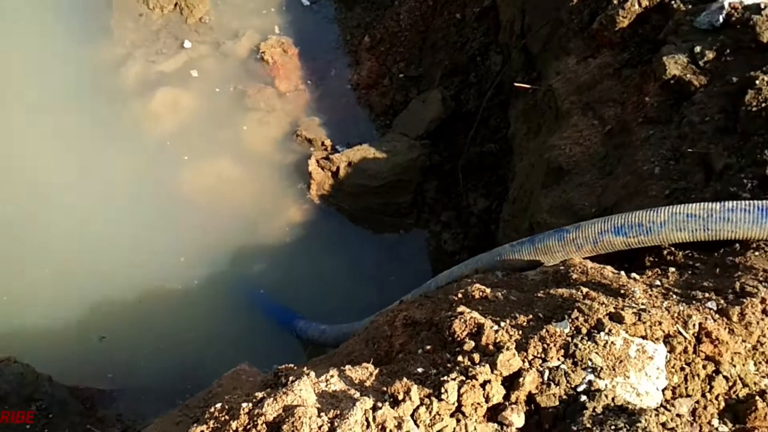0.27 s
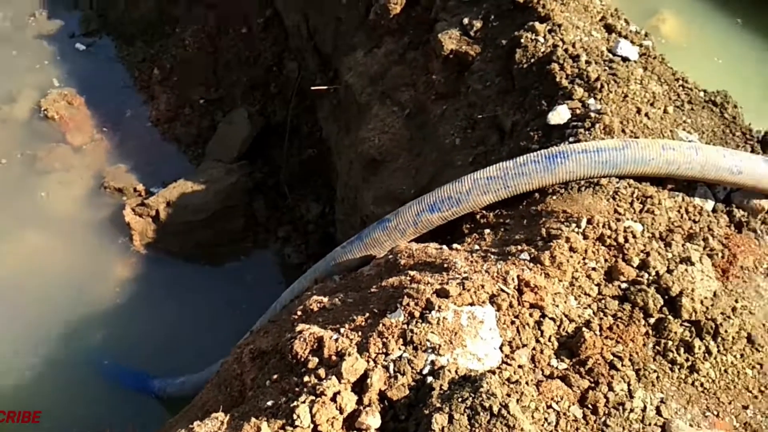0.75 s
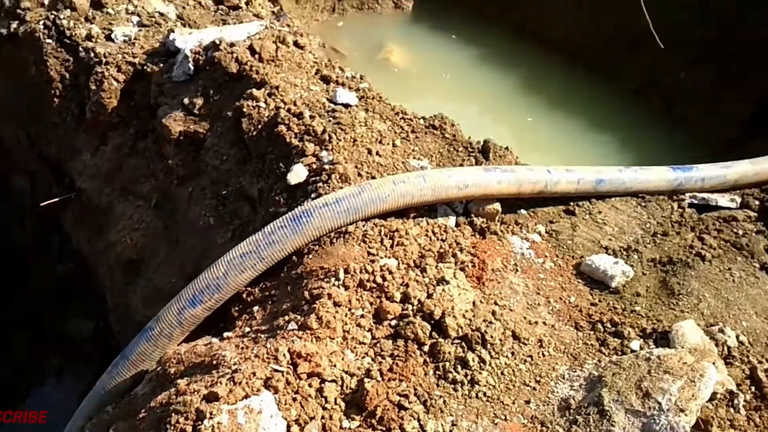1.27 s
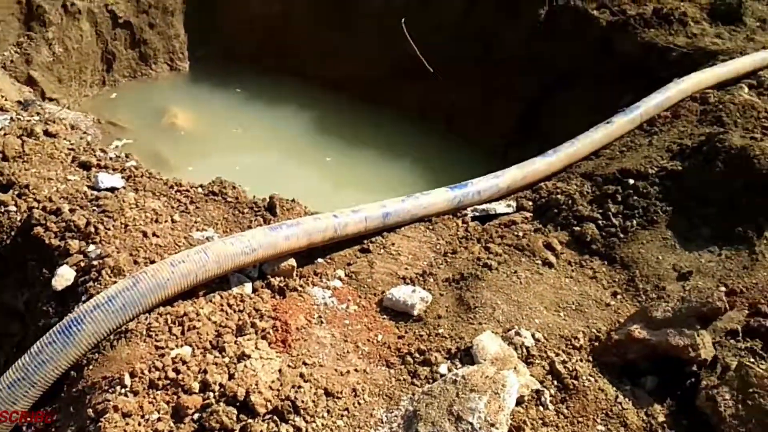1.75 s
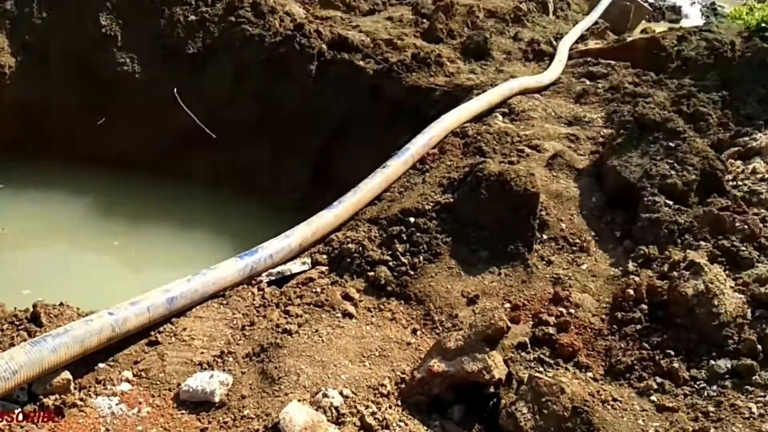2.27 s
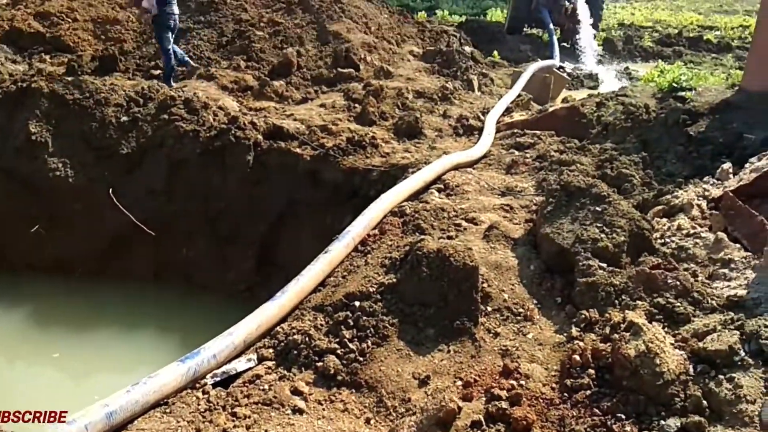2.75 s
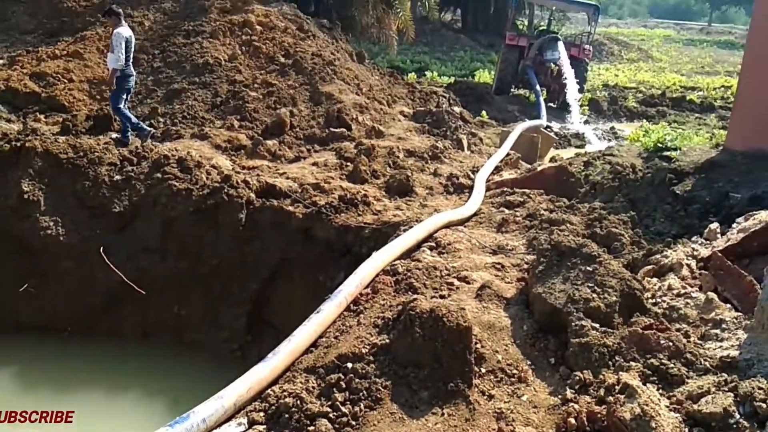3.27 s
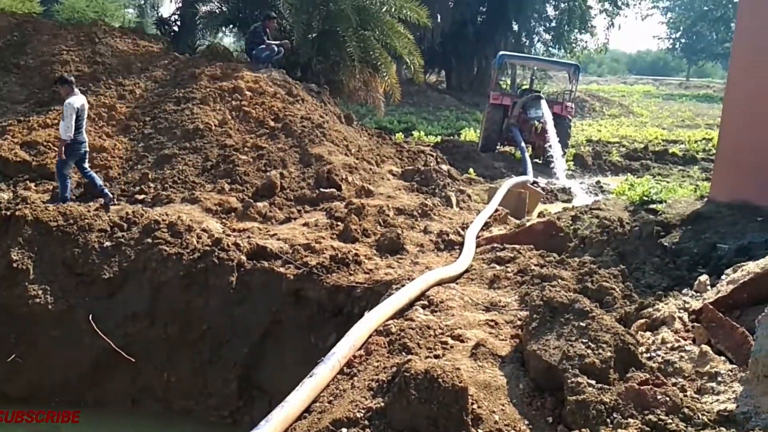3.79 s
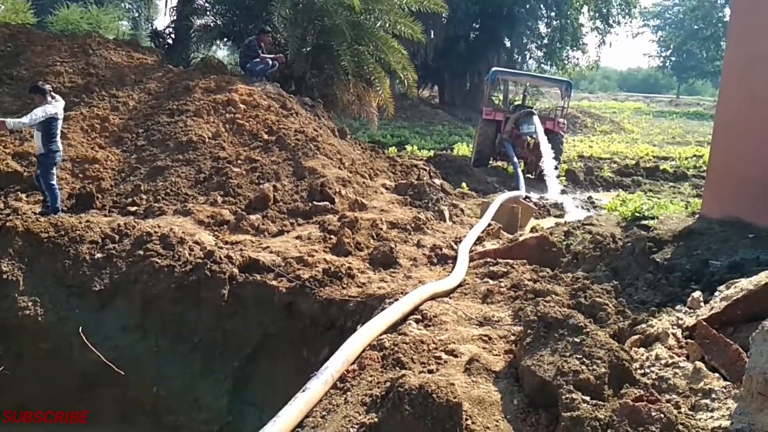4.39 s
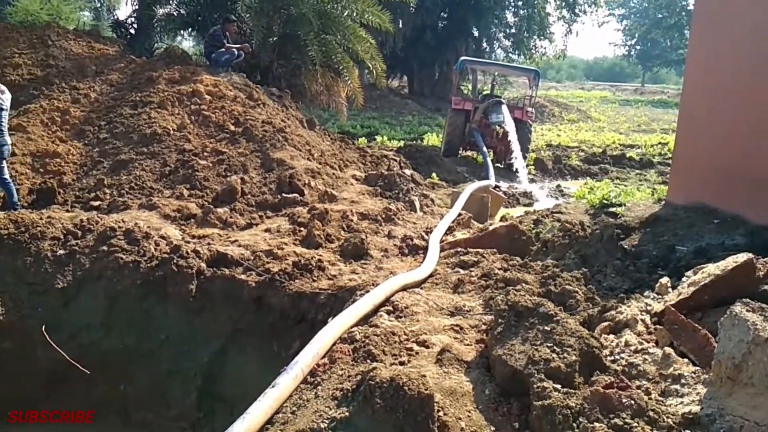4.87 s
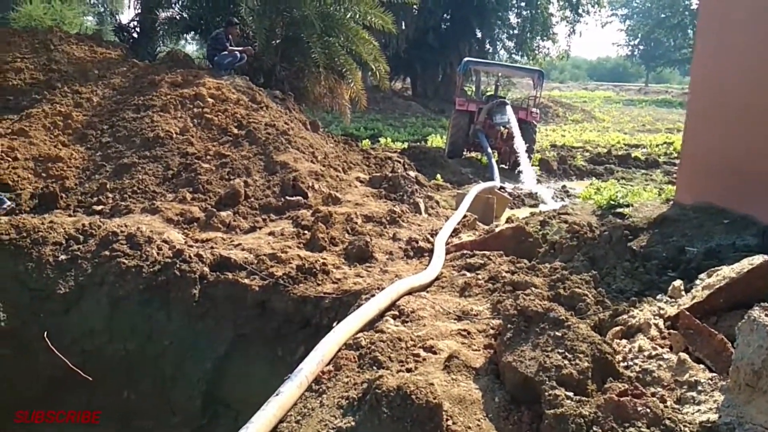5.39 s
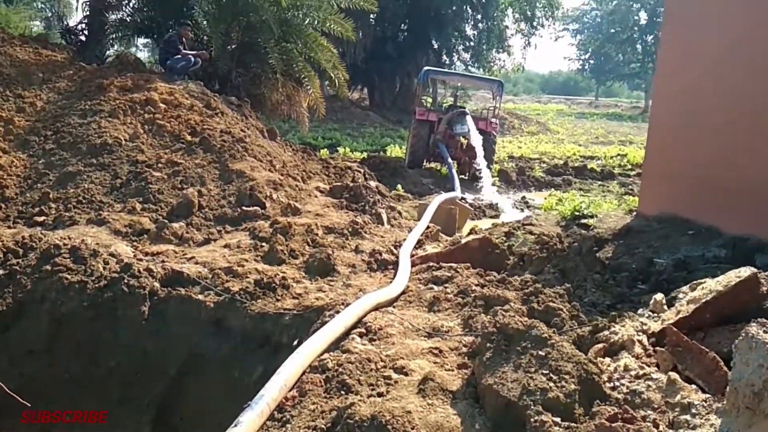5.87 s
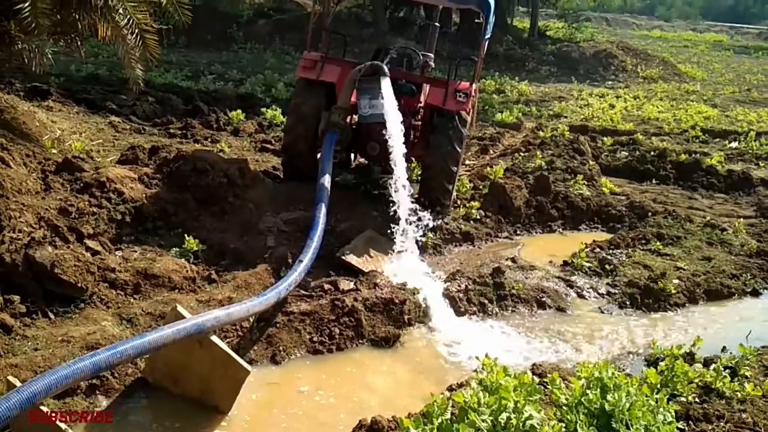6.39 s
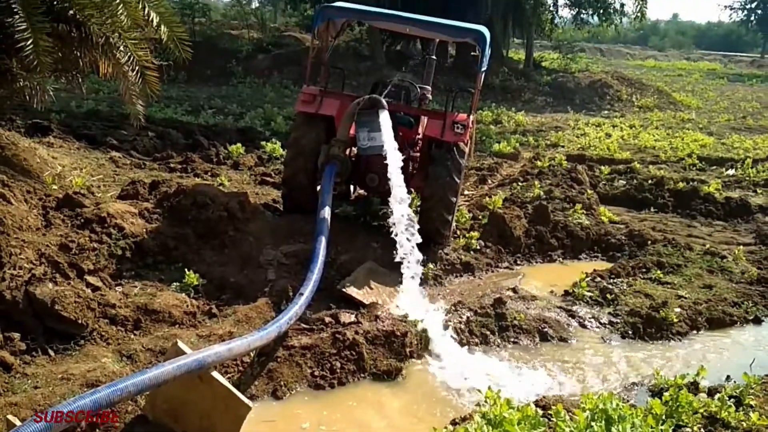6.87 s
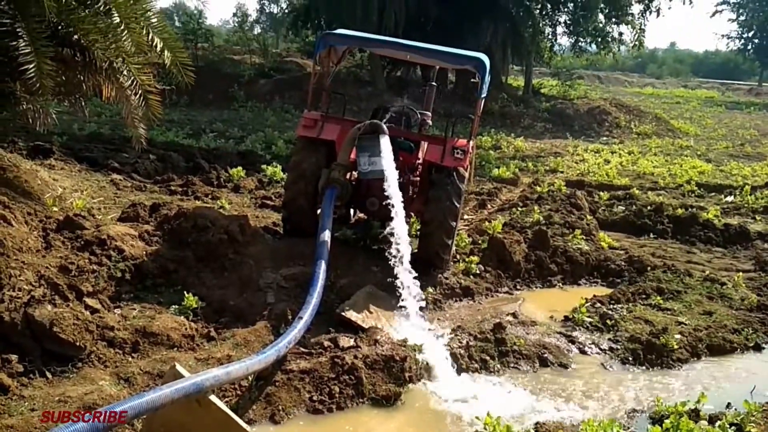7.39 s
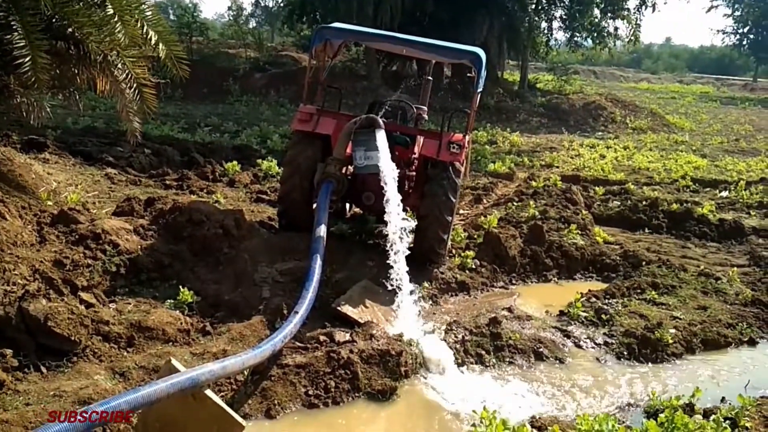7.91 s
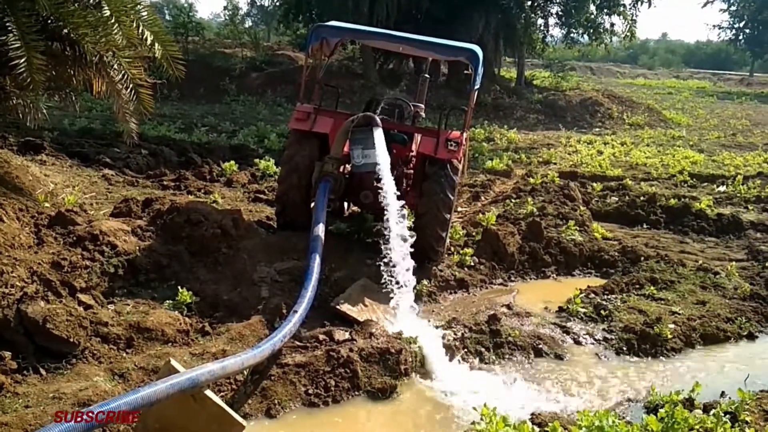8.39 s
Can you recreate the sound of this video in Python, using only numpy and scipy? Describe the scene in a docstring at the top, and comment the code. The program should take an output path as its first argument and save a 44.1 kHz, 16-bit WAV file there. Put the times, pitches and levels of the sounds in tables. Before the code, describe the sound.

Outdoors, a three-cylinder diesel tractor runs at constant speed in the distance, boxy and coloured as the microphone rises from a dug pit, then clearer with a sweeping hollow tone. Faint water hiss, tiny handling ticks and soft wind accompany it. Near six seconds it cuts abruptly to close by: louder engine throb and a water jet pounding, bubbling and slapping into a muddy pool until the end.

```python
"""First a distant three-cylinder diesel tractor and a water jet are heard from a microphone rising out of a pit:
the pit colours the engine noise and the ground echo sweeps a notch down through it. Ticks, far calls and gusts
follow; then the scene cuts to a spot beside the jet, which pounds and splashes into a muddy pool.
The engine is pulses ringing a pipe, patterned block noise and shaft-locked tones; the water is shaped noise,
damped drop and bubble rings and thudding air cavities."""
import sys
import numpy as np
from scipy import signal
from scipy.fft import rfft, irfft, next_fast_len
from scipy.io import wavfile
from scipy.ndimage import uniform_filter1d, map_coordinates

SR = 44100
rng = np.random.default_rng(int(sys.argv[2]) if len(sys.argv) > 2 else 0)


def unload_audio(sound):
    """Save the sound as a 16-bit wav file, at the path given as the first command line argument."""
    columns = np.transpose(np.atleast_2d(sound))
    # keep every value between -1 and 1, then stretch to whole-number steps
    steps = np.round(np.clip(columns, -1, 1) * 32767)
    wavfile.write(sys.argv[1], SR, steps.astype(np.int16))


N = 381465

# Exhaust spectrum: (multiple of the firing rate [1], relative level [dB])
FAR_PIPE = [(1, -8.5), (2, 4.5), (3, 6), (4, -4.5), (5, -20), (6, -17), (7, -11), (8, -20), (9, -26),
            (10, -27), (11, -29), (12, -40)]
NEAR_PIPE = [(1, -3), (2, 4), (3, 3), (4, -8), (5, -8), (6, -8), (7, -11), (8, -20), (9, -22), (10, -17),
             (11, -20), (12, -18)]
# Drone of block, gears and pump: (multiple of the cycle rate [1], nominal far level [dB], nominal near level [dB])
WHINE = [(13, -56, -50), (14, -56.5, -45), (16, -62, -45), (22, -61, -50), (26, -54.5, -55), (29, -63, -55),
         (34, -58, -53), (37, -56, -55), (46, -59, -60), (50, -60, -60), (54, -61, -56), (59, -62, -58),
         (62, -57.5, -44.5), (65, -63, -58), (78, -60, -56), (81, -60, -60), (87, -58, -52), (96, -55, -49),
         (105, -53, -54), (109, -64, -55), (115, -61, -57), (122, -65, -51), (129, -67, -58)]
# Low turbulence, of the far engine and of the plunging jet: (frequency [Hz], relative density [dB per Hz])
FAR_RUMBLE = [(15, -33), (28, 2), (45, -0.5), (80, -2.5), (125, -2), (200, -5.5), (320, -10.5),
              (450, -22.5), (600, -22), (1000, -63)]
PLUNGE = [(20, -22), (40, -1), (70, -1), (100, 6), (150, 3.5), (220, 2.5), (300, -4.5), (420, -12.5),
          (600, -17.5), (1000, -61)]
# Engine block noise: (frequency [Hz], relative density [dB per Hz])
FAR_BLOCK = [(200, -23), (350, -4.5), (550, -1.5), (800, 4), (950, -3), (1200, -0.5), (1400, 3),
             (1600, 5.5), (1900, -3.5), (2300, -3.5), (2700, -12), (3200, -18), (4500, -24.5)]
NEAR_BLOCK = [(220, 1), (380, -1.5), (416, -6), (456, -3), (564, -4.5), (641, -14.5), (756, 1), (875, -7),
              (951, 1.5), (1170, -6.5), (1480, -5), (1710, -6), (1840, -2.5), (2560, -16.5), (3400, -25.5),
              (4420, -60), (7480, -120)]
# Hiss of torn water: (frequency [Hz], relative density [dB per Hz])
FAR_SPRAY = [(1760, 2.5), (3000, 4.5), (3650, -3), (4200, -3.5), (5400, 3.5), (6540, -4), (7710, -3),
             (9480, -1), (11400, 2), (13300, 0), (14700, -5), (15600, -18)]
NEAR_SPRAY = [(1650, -38), (2800, 1.5), (3050, -7.5), (3300, -2), (3900, -6.5), (5270, 0.5), (6260, -7.5),
              (6870, -1.5), (7710, 0.5), (8900, -2), (11000, -3), (12000, 2.5), (12700, 4), (13500, 1),
              (15600, -10)]
# Left-right correlation: (frequency [Hz], correlation [-1 to 1])
ALIKE = [(60, 0.5), (150, 0.72), (290, .88), (640, 0.96), (1100, 0.96), (1600, 0.8), (3100, 0.2),
         (6000, 0.14), (15000, 0.17)]
FAR_SPRAY_ALIKE = [(2000, .7), (15000, .55)]
# Port colour, before it is eased off for long waves: (frequency [Hz], left minus right [dB])
FAR_TILT = [(60, 3.5), (120, -7), (240, -9), (480, 1.5), (950, -3.5), (1500, -4.5), (2000, 0), (3000, 0),
            (5500, 3.5), (7520, 1), (15000, -1)]
NEAR_TILT = [(60, -5), (95, 3), (150, 0), (240, 8), (380, -1.5), (600, -3.5), (950, -1), (1500, -6.5),
             (2380, -0.5), (3770, 9), (5980, 5), (9470, 4.5), (15000, -1)]
# Small handling ticks: (time [s], nominal peak [dB], brightest frequency [Hz], left minus right [dB])
TICKS = [(1.1228, -29, 2800, 0), (1.964, -33, 11000, 0), (4.0786, -35, 10000, 0), (4.8179, -28, 12700, -7),
         (4.856, -25, 12700, -7)]
# Faint distant calls: (time [s], length [s], start pitch [Hz], end pitch [Hz], level before quiver [dB])
FAR_CALLS = [(1.6, .1, 650, 615, -45.5), (3.77, .39, 3365, 3400, -49.5)]
# Colour the pit gives to sound from outside, at full depth: (frequency [Hz], gain [dB])
PIT_COLOUR = [(300, 6), (520, 7), (750, 1), (1000, 12), (1300, 3.5), (1650, -0.5), (2000, 3.5), (2600, 0),
              (3300, 2), (5500, 2)]
# Wind buffeting: (frequency [Hz], relative density [dB per Hz])
BREEZE = [(15, -30), (35, -7), (80, 15.5), (160, 6.5), (280, -7), (450, -6), (900, -50)]
# Light gusts above the pit: (time [s], half-width [s], level [dB])
GUSTS = [(2.85, 0.4, -36), (5.45, 0.25, -41)]
# The jet pounds the pool harder: (time [s], half-width [s], gain [dB])
SURGES = [(6.15, 0.08, 2.5), (6.48, 0.084, 7), (6.77, 0.054, 7), (7.1, 0.23, 1.5), (7.54, 0.14, 7.5),
          (7.8, 0.05, 2.5)]
# Heavy lumps of the jet slapping into the pool: (time [s], nominal peak [dB], initial cavity pitch [Hz])
SLAPS = [(6.525, -21, 95), (6.768, -21, 125), (7.432, -20, 95), (7.503, -13, 150), (7.568, -17, 120),
         (7.634, -22, 125), (7.763, -21, 150), (7.965, -16, 215)]
# Knocks of combustion and valve gear: (place in the cycle [0-1], full thump [dB], full tick [dB])
STROKES = [(.195, 0, 4.5), (.285, 4.5, 4), (.35, 0, 2.5), (.55, 2, 3.5), (.67, 1, 1), (.81, 2, 0),
           (.92, 2, 1)]
# Far hiss, each level read relative to its column's median: (time [s], middle level [dB], top level [dB])
HISS = [(0, -57.5, -71), (0.72, -61.5, -60.5), (1.39, -57, -56), (1.9, -59, -54), (2.33, -57, -59.5),
        (2.55, -55, -53), (3.3, -54.5, -50.5), (3.76, -56.5, -52.5), (4.35, -53.5, -49), (4.76, -56, -55),
        (5.2, -54, -54), (5.9, -52.5, -57)]

# Time of the cut [s]; how far on in its cycle the engine then is [cycles]
CUT_S, CUT_SKIP = 5.945, .37
# Mean engine cycle rate and upper band limit [Hz]
CYCLE_HZ, TOP_HZ = 15.385, 15700
# Source levels at the pit's edge and beside the jet [dB]
FAR_EXHAUST_DB, FAR_RUMBLE_DB, FAR_CLATTER_DB, FAR_SPRAY_DB = -30.3, -38, -37, -50.5
NEAR_EXHAUST_DB, NEAR_PLUNGE_DB, NEAR_CLATTER_DB, NEAR_SPRAY_DB = -25, -31.5, -29.5, -39
BUBBLES_DB, SPLATS_DB, DRAUGHT_DB = -40.5, -50, -33.5
# One smooth microphone move: left and right ears rise, it turns to the tractor and clears the rim (middle, easing [s])
RISE_S, RISE_EASE_S = 0.98, 0.43
RIGHT_RISE_S, RIGHT_RISE_EASE_S = 1.2, 0.4
TURN_S, TURN_EASE_S = 1.56, 0.25
CLEAR_S, CLEAR_EASE_S = 1.22, 0.65
# The ground echo emerges as the microphone leaves the pit's floor (middle, easing [s]); the right ear's share [1]
OPEN_S, OPEN_EASE_S, RIGHT_ECHO_SHARE = .4, .12, .5
# Ground echo lag, low and high [ms]; the soil's reflected share [1] and phase turn [rad]
LOW_ECHO_MS, HIGH_ECHO_MS = 0.46, 1.17
SOIL_SHARE, SOIL_TURN = .8, 1.1
# Lead of the left ear with the tractor to one side, then almost ahead [ms]
ASIDE_LEAD_MS, AHEAD_LEAD_MS = 0.36, 0.11
# Loss at the bottom of the pit [dB]; brief screening of the clatter by the bank (middle [s], half-width [s], loss [dB])
PIT_RUMBLE_LOSS_DB, PIT_CLATTER_LOSS_DB = 5.5, 1.5
SCREEN_S, SCREEN_WIDTH_S, SCREEN_DB = 0.69, 0.24, 1.5
# Inverted hiss echo off a nearby surface: share [1], lag in the pit and above it [ms], scale of the hand's sway [ms]
HISS_ECHO_SHARE, PIT_HISS_MS, CLEAR_HISS_MS, SWAY_MS = .38, .445, .308, .004
# Slow beat of the exhaust's third harmonic: period [s], first crest [s], swing either way [dB]
BEAT_S, BEAT_CREST_S, BEAT_DB = 1.425, 0.19, 2
# Inequality of the three firings [1]; share of block noise power that repeats every cycle [1]
FAR_UNEVEN, NEAR_UNEVEN = .28, .5
FAR_REPEAT, NEAR_REPEAT = .4, .34
# Half-widths of a thump and a tick [s]; the pump's churning leaves this share of the knock depth in dB close by [1]
THUMP_S, TICK_S, NEAR_STROKE_SHARE = .0028, .002, .6
# Random level scales [dB]: spray sputter, lumps in the pounding, quiver of the calls
FAR_FLUTTER_DB, NEAR_FLUTTER_DB, LUMPS_DB, QUIVER_DB = 1.2, 1.7, 1.4, 3.2
# Slap decay by 60 dB [s] and relative level of its churning noise [dB]
SLAP_T60_S, CHURN_DB = .075, -6


def amp(db):
    """Amplitude gain is ten to the power of decibels over twenty."""
    return 10 ** (np.asarray(db) / 20)


def unit(x):
    """Dividing by the root mean square gives an rms of 1."""
    return x / np.sqrt(np.mean(x ** 2) + 1e-20)


def along(points, hz):
    """Frequency is read on a logarithmic axis, with linear interpolation between points."""
    f, v = np.transpose(points)
    return np.interp(np.log(hz + 1e-3), np.log(f), v)


def wobble(rate):
    """Spline interpolation of random knots, `rate` a second, gives a slow smooth fluctuation."""
    knots = rng.standard_normal(int(N * rate / SR) + 4)
    return map_coordinates(knots, [np.arange(N) * rate / SR], order=2)


def ease(middle_s, ease_s):
    """A hyperbolic tangent moves smoothly from 0 to 1."""
    return .5 + .5 * np.tanh((np.arange(N) / SR - middle_s) / (2 * ease_s))


def hump(middle_s, width_s):
    """A Gaussian swells from 0 to 1 and back."""
    return np.exp(-((np.arange(N) / SR - middle_s) / width_s) ** 2)


def filtered(x, response):
    """A linear filter multiplies the spectrum by its frequency response."""
    size = next_fast_len(N + 8192)
    hz = np.fft.rfftfreq(size, 1 / SR)
    return irfft(rfft(x, size) * response(hz), size)[..., :N]


def delayed(x, seconds):
    """A changing path length is a moving delay, read here by interpolation."""
    return np.interp(np.arange(N) - seconds * SR, np.arange(N), x)


def spread(pair, spectrum, alike=ALIKE):
    """Mixing two unrelated signals as middle and side sets the ears' correlation; the middle has rms 1."""
    def mid_side(hz):
        turn = np.arccos(np.clip(along(alike, hz), -1, 1)) / 2
        return amp(along(spectrum, hz)) * [np.cos(turn), np.sin(turn)]

    mid, side = filtered(pair, mid_side)
    return np.array([mid + side, mid - side]) / np.std(mid)


def ports(x, tilt):
    """Each microphone port colours short waves in its own way, while long waves reach both equally."""
    def response(hz):
        short = hz ** 4 / (hz ** 4 + 350 ** 4)
        return amp(np.outer([1, -1], short * along(tilt, hz)) / 2)

    return filtered(x, response)


def from_pit(crank):
    """Distance, pit colour and echo interference shape the far tractor and jet as the microphone moves."""
    height, turn = ease(RISE_S, RISE_EASE_S), ease(TURN_S, TURN_EASE_S)
    depth = 1 - ease(CLEAR_S, CLEAR_EASE_S)

    block = over_ground(in_pit(clatter(crank, FAR_BLOCK, FAR_REPEAT), depth))
    # evening out the half-second level leaves the dB curve below in charge of loudness
    block /= np.sqrt(uniform_filter1d(block.mean(0) ** 2, SR // 2))
    clatter_db = FAR_CLATTER_DB - PIT_CLATTER_LOSS_DB * depth - SCREEN_DB * hump(SCREEN_S, SCREEN_WIDTH_S)
    engine = amp(clatter_db) * block
    engine += amp(FAR_EXHAUST_DB) * beating(exhaust(crank, FAR_PIPE, FAR_UNEVEN, scatter_db=0.67))
    rumble_db = FAR_RUMBLE_DB - PIT_RUMBLE_LOSS_DB * (1 - height) ** 3
    engine += amp(rumble_db) * rumble(crank, FAR_RUMBLE, throb_db=3.0)
    tones = [(multiple, far_db) for multiple, far_db, _ in WHINE]
    engine += (1 - 0.3 * depth) * over_ground(whine(crank, tones))

    left, right = engine + far_water() + calls()
    lead_ms = ASIDE_LEAD_MS + (AHEAD_LEAD_MS - ASIDE_LEAD_MS) * turn
    heard = ports(np.array([left, delayed(right, lead_ms / 1000)]), FAR_TILT)
    gusts = sum(amp(db) * hump(s, width) for s, width, db in GUSTS) * breeze(right_db=-7)
    return heard + gusts + ticks()


def clatter(crank, spectrum, repeat, strokes=1):
    """Periodic modulation: knocks shape block noise, part of which repeats exactly every engine cycle."""
    size = int(SR / CYCLE_HZ)
    pattern = unit(irfft(np.exp(2j * np.pi * rng.random((2, size // 2 + 1))), size))
    rattle = pattern[:, (crank % 1 * size).astype(int)]
    noise = np.sqrt(repeat) * rattle + np.sqrt(1 - repeat) * rng.standard_normal((2, N))
    bright = filtered(noise, lambda hz: hz ** 6 / (hz ** 6 + 1100 ** 6))

    def knock(place, width_s):
        away_s = ((crank - place + .5) % 1 - .5) / CYCLE_HZ
        return np.exp(-(away_s / width_s) ** 2)

    thump_db = sum(db * knock(place, THUMP_S) for place, db, _ in STROKES)
    tick_db = sum(db * knock(place, TICK_S) for place, _, db in STROKES)
    thumps = unit(amp(strokes * thump_db)) * (noise - bright)
    valve_ticks = unit(amp(strokes * tick_db)) * bright
    return spread(thumps + valve_ticks, spectrum)


def in_pit(x, depth):
    """Enclosure colour: the deeper the microphone, the more the pit's walls and rim filter the sound."""
    coloured = filtered(x, lambda hz: amp(along(PIT_COLOUR, hz)))
    return x + depth * (coloured - x)


def over_ground(x):
    """Comb interference: a soil echo, strongest in the bass, lags more as each ear rises."""
    heights = ease(RISE_S, RISE_EASE_S), ease(RIGHT_RISE_S, RIGHT_RISE_EASE_S)
    soil = lambda hz: SOIL_SHARE * np.exp(1j * SOIL_TURN) / (1 + (hz / 3300) ** 4)
    bounce = filtered(x, soil) * ease(OPEN_S, OPEN_EASE_S) * [[1], [RIGHT_ECHO_SHARE]]
    lags_ms = [LOW_ECHO_MS + (HIGH_ECHO_MS - LOW_ECHO_MS) * height for height in heights]
    return x + np.array([delayed(ear, lag_ms / 1000) for ear, lag_ms in zip(bounce, lags_ms)])


def exhaust(crank, pipe, uneven, scatter_db):
    """Pulse excitation of a resonator: three unequal firings a cycle each ring the pipe."""
    fired = np.flatnonzero(np.diff(np.floor(3 * crank)))
    cylinder = 1 + uneven * np.cos(2 * np.pi * np.arange(len(fired)) / 3)
    puffs = np.bincount(fired, cylinder * amp(scatter_db * rng.standard_normal(len(fired))), N)
    size = 2 ** 14
    hz = np.fft.rfftfreq(size, 1 / SR)
    multiples, db = np.transpose(pipe)
    gain = amp(np.interp(hz / (3 * CYCLE_HZ), [0, *multiples, 20], [-40, *db, -80]))
    # the doubled causal half of the cepstrum gives a pipe that rings only after its puff
    cepstrum = irfft(np.log(gain))[:size // 2]
    # the silencer's chamber holds the lowest waves back, so the puffs run together
    chamber = 62 ** 2 - hz ** 2 + 20j * hz
    ring = irfft(np.exp(rfft(2 * cepstrum, size)) * chamber.conj() / chamber)
    return unit(signal.fftconvolve(puffs, ring)[:N])


def beating(note):
    """Slow amplitude modulation: the third firing harmonic swells and fades."""
    third = filtered(note, lambda hz: np.exp(-((hz / CYCLE_HZ - 9) / 1.5) ** 4))
    swing = np.cos(2 * np.pi * (np.arange(N) / SR - BEAT_CREST_S) / BEAT_S)
    return note + (amp(BEAT_DB * swing) - 1) * third


def rumble(crank, spectrum, throb_db):
    """Modulated turbulence: low noise swells at each firing, or between firings if throb_db is negative."""
    throb = amp(throb_db * np.cos(6 * np.pi * crank))
    return spread(rng.standard_normal((2, N)) * throb, spectrum)


def whine(crank, tones):
    """Shaft-locked tones: phase follows the crank, so the shaft's twisting blurs the higher multiples most."""
    out = np.zeros(N)
    for multiple, db in tones:
        swell = amp(1.8 * wobble(6) - .5)
        twisted = crank + .001 * wobble(12)
        tone = np.sin(2 * np.pi * (multiple * twisted + rng.random()))
        out += np.sqrt(2) * amp(db) * swell * tone
    return out


def far_water():
    """Comb interference: the far jet's hiss meets a short inverted echo whose lag shifts with the microphone."""
    hiss = spray(FAR_SPRAY, FAR_SPRAY_ALIKE, drops_db=-10.5, flutter_db=FAR_FLUTTER_DB)
    lag_ms = PIT_HISS_MS + (CLEAR_HISS_MS - PIT_HISS_MS) * ease(TURN_S, TURN_EASE_S) + SWAY_MS * wobble(1.5)
    hiss = hiss - HISS_ECHO_SHARE * np.array([delayed(ear, lag_ms / 1000) for ear in hiss])
    top = filtered(hiss, lambda hz: hz ** 16 / (hz ** 16 + 9500. ** 16))
    s, *levels = np.transpose(HISS)
    middle_db, top_db = (np.interp(np.arange(N) / SR, s, db - np.median(db)) for db in levels)
    return amp(FAR_SPRAY_DB) * (amp(middle_db) * (hiss - top) + amp(top_db) * top)


def spray(spectrum, alike, drops_db, flutter_db):
    """Torn water is fizz plus sharp droplet impacts, sputtering as lumps of the jet land."""
    drops = grains(1300, 5400, 8700, cycles=0.36, scatter_db=3.5, rise=0, size=32)
    sputter = amp(flutter_db * unit(.25 * wobble(13) + wobble(36) + .7 * wobble(95)))
    fizz = unit(rng.standard_normal((2, N)) + amp(drops_db) * drops)
    # the finest mist comes and goes on its own
    mist = filtered(fizz, lambda hz: 1 / (1 + (9000 / (hz + 1)) ** 8))
    fizz = fizz + (amp(1.1 * wobble(24)) - 1) * mist
    return sputter * spread(fizz, spectrum, alike)


def grains(rate, low_hz, high_hz, cycles, scatter_db, rise, size):
    """Damped oscillators: random rings of drops or bubbles, `rate` a second, reach both ears; rms 1."""
    when, pitch, weight, place = rng.random((int(rate * N / SR), 4)).T[..., None]
    hz = low_hz * (high_hz / low_hz) ** pitch
    # age 1 is the given number of cycles at the starting pitch
    age = hz * np.arange(size) / SR / cycles
    strength = amp(-scatter_db * np.log(0.011 + weight))
    ring = strength * np.exp(-3 * age) * np.sin(2 * np.pi * cycles * age * (1 + rise * age))
    start = (when * N).astype(int) + np.arange(size)
    # an earlier arrival at one ear is a later one at the other
    lag = (place * SR * .0006).astype(int)
    ears = [np.bincount((start + d).ravel(), ring.ravel(), N)[:N] for d in (lag, lag.max() - lag)]
    return unit(np.array(ears))


def ticks():
    """Damped impacts: decaying noise through a resonance gives tiny dry clicks right at the microphone."""
    out, t = np.zeros((2, N)), np.arange(SR // 50) / SR
    for s, db, hz, pan_db in TICKS:
        crack = amp(db - 60 * t / 0.0095) * rng.standard_normal((2, len(t)))
        ring = signal.lfilter(*signal.iirpeak(min(hz, TOP_HZ), 4, SR), crack)
        pan = amp([[pan_db / 2], [-pan_db / 2]])
        out[:, round(s * SR):][:, :len(t)] += pan * (ring + 0.32 * crack)
    return out


def calls():
    """Gliding tones: integrated frequency gives the phase of a hoot and a thin whistle far across the field."""
    out, t = np.zeros(N), np.arange(N) / SR
    for s, length, start_hz, end_hz, db in FAR_CALLS:
        u = np.clip((t - s) / length, 0, 1)
        hz = (start_hz + (end_hz - start_hz) * u) * (1 + .003 * wobble(70))
        level = amp(db + QUIVER_DB * wobble(70)) * (4 * u * (1 - u)) ** .3
        out += level * np.sin(2 * np.pi * np.cumsum(hz) / SR)
    return out


def breeze(right_db):
    """Wind turbulence: buffeting is unrelated at the two ports and stronger on the windward left."""
    eddies = rng.standard_normal((2, N)) * amp(4.8 * np.array([wobble(11), wobble(12)]))
    return unit(filtered(eddies, lambda hz: amp(along(BREEZE, hz)))) * amp([[0], [right_db]])


def beside_jet(crank):
    """Superposition close by: the tractor sounds with a jet that churns the pool into bubbles and spray."""
    surge_db = sum(db * hump(s, width) for s, width, db in SURGES)
    engine = amp(NEAR_CLATTER_DB) * clatter(crank, NEAR_BLOCK, NEAR_REPEAT, NEAR_STROKE_SHARE)
    engine += amp(NEAR_EXHAUST_DB) * beating(exhaust(crank, NEAR_PIPE, NEAR_UNEVEN, scatter_db=0.9))
    engine += whine(crank, [(multiple, near_db) for multiple, _, near_db in WHINE])
    plunge_db = NEAR_PLUNGE_DB + surge_db + LUMPS_DB * wobble(22)
    plunge = amp(plunge_db) * rumble(crank, PLUNGE, throb_db=-3.5)
    draught = amp(DRAUGHT_DB + surge_db) * breeze(right_db=-6)
    # one channel of bubbles serves both ears
    bubble_rings = grains(220, 534, 2360, cycles=12.3, scatter_db=0.0, rise=0.11, size=700)[0]
    bubbles = amp(BUBBLES_DB) * unit(bubble_rings)
    splats = amp(SPLATS_DB) * grains(160, 1350, 6500, cycles=0.76, scatter_db=0.5, rise=0, size=200)
    water = splats + amp(NEAR_SPRAY_DB) * spray(NEAR_SPRAY, ALIKE, drops_db=-12, flutter_db=NEAR_FLUTTER_DB)
    return ports(engine + plunge + bubbles + water, NEAR_TILT) + slaps() + draught


def slaps():
    """Cavity resonance: each lump churns the pool and opens an air cavity whose thud rises as it closes."""
    out, t = np.zeros(N), np.arange(SR // 8) / SR
    # (frequency [Hz], relative level [dB])
    churn_colour = [(60, -30), (180, 0), (450, -4), (800, -30)]
    churn = unit(filtered(rng.standard_normal(N), lambda hz: amp(along(churn_colour, hz))))
    for s, db, hz in SLAPS:
        start = round(s * SR)
        thud = np.sin(2 * np.pi * hz * t * (1 + 2 * t)) + amp(CHURN_DB) * churn[start:][:len(t)]
        envelope = amp(db - 60 * t / SLAP_T60_S) * (1 - np.exp(-t / 0.0025))
        out[start:][:len(t)] += envelope * thud * 1.01
    return out


def scene():
    """Governed rotation: engine speed stays almost still, while the viewpoint jumps at the cut."""
    crank = np.cumsum(CYCLE_HZ * (1 + .0005 * wobble(5))) / SR
    close = np.clip((np.arange(N) / SR - CUT_S) / 0.0044, 0, 1)
    return (1 - close) * from_pit(crank) + close * beside_jet(crank + CUT_SKIP)


def record(dry):
    """Band limiting: the deepest bass is thinned and nothing passes above the upper limit."""
    return filtered(dry, lambda hz: hz ** 6 / (hz ** 6 + 32 ** 6) * (hz < TOP_HZ))


dry = scene()
out = record(dry)
unload_audio(out)
```